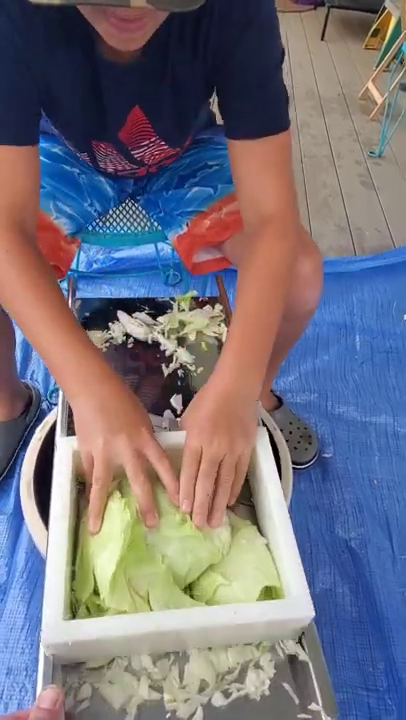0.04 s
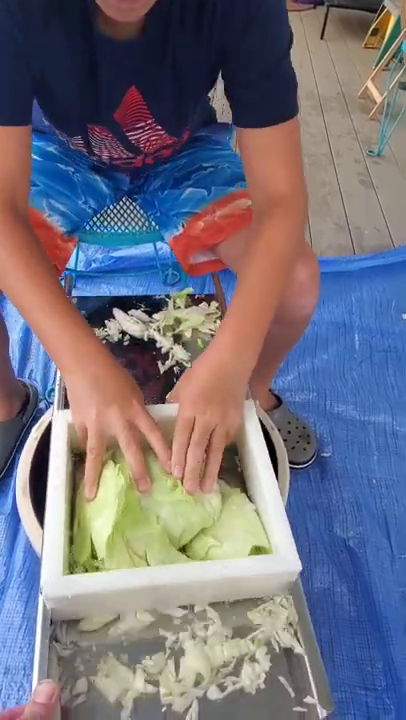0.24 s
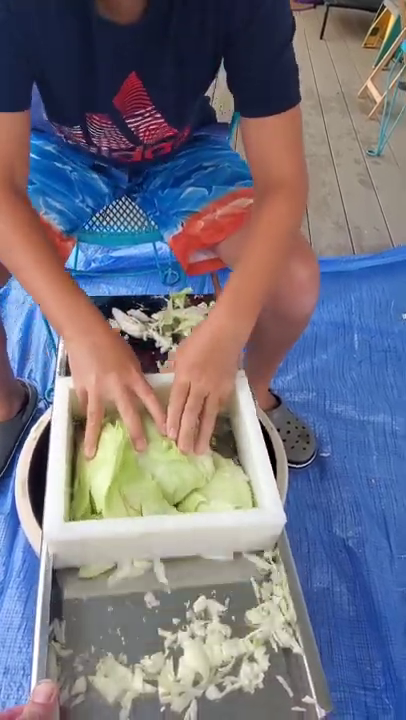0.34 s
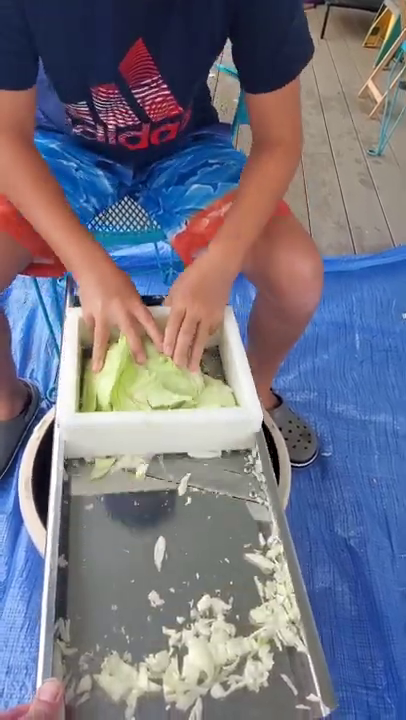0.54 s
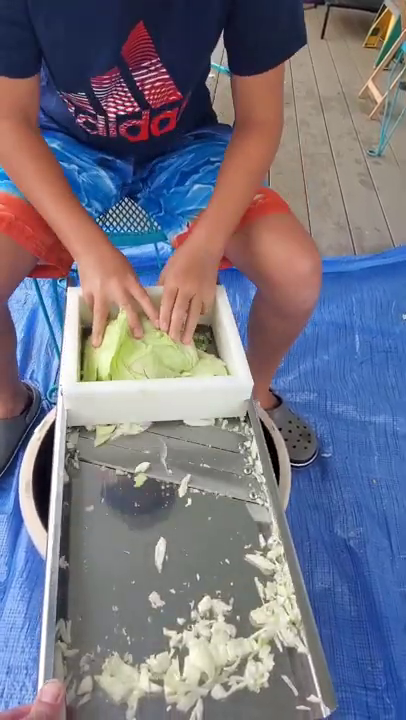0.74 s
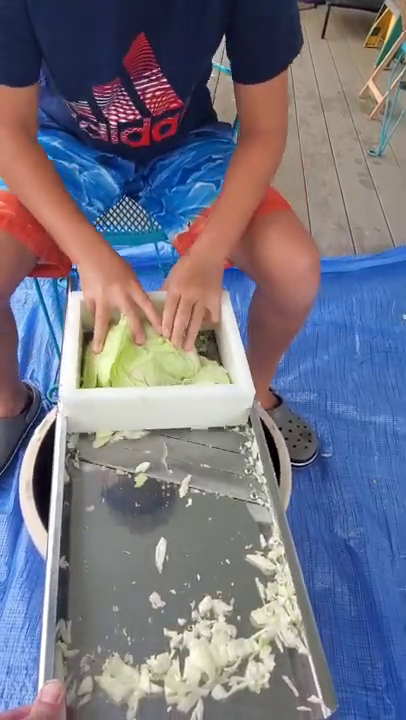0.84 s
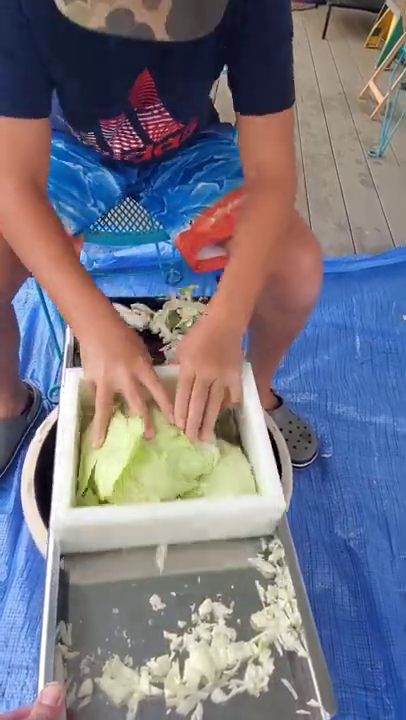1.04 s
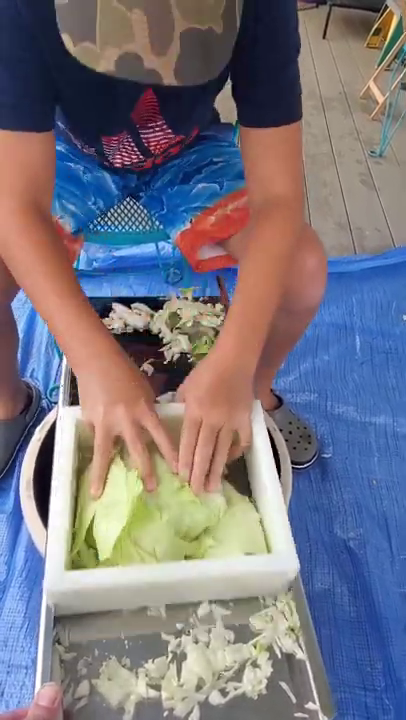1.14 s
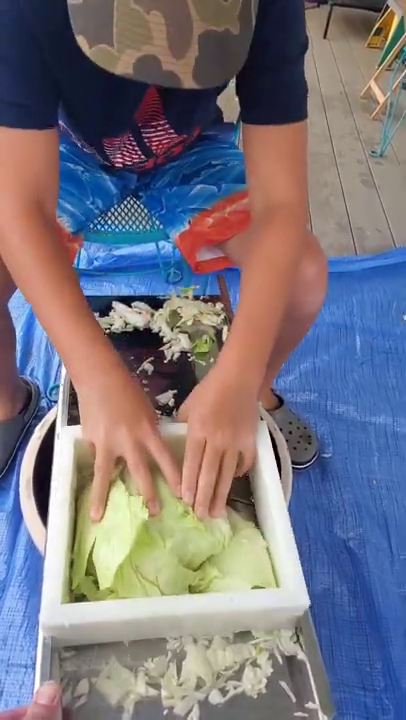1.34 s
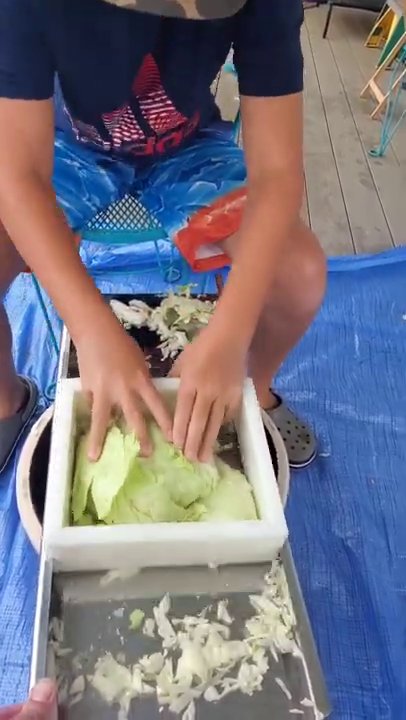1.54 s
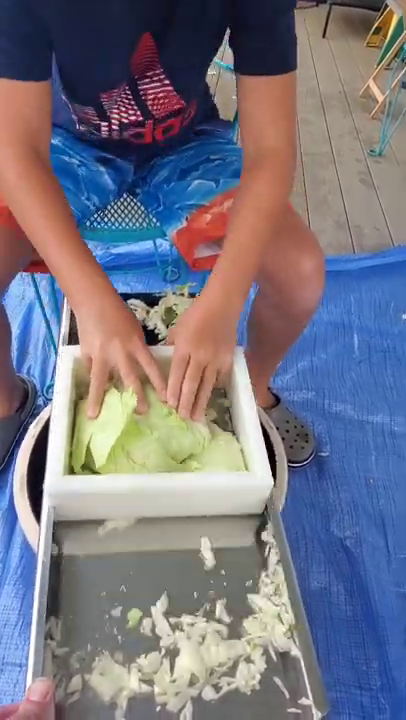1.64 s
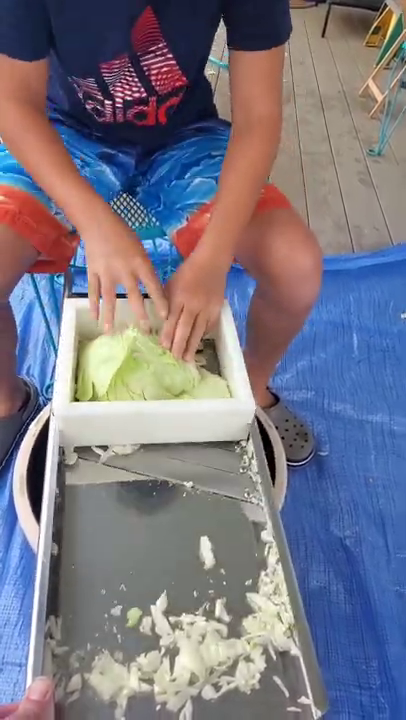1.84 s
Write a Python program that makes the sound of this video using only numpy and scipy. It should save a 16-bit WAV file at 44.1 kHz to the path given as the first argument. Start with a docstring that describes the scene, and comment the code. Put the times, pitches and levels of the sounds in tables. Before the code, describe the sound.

Cabbage being shredded, a plastic box scraping and knocking over steel blades with a crisp crunch.

```python
"""Close, hollow scraping, knocks and a crisp crunch: cabbage being shredded outdoors.
A plastic box slides to and fro on a steel tray. It sticks and slips, knocks on its rails and sets
the tray droning; on the forward stroke the blades burst the leaves' cells in a dense crackle.
Single leaves snap on the way back, and the whole rig bumps dully on its support."""
import sys
import numpy as np
from scipy import signal
from scipy.fft import rfft, irfft
from scipy.io import wavfile
from scipy.ndimage import uniform_filter1d

SR = 44100
rng = np.random.default_rng(int(sys.argv[2]) if len(sys.argv) > 2 else 0)


def master_out(mix):
    """Clip the mix to full scale and print it as 16-bit PCM to the path in sys.argv[1]."""
    frames = np.transpose(np.atleast_2d(mix))
    ceiling = np.clip(frames, -1, 1)
    pcm = np.round(ceiling * 32767).astype(np.int16)
    wavfile.write(sys.argv[1], SR, pcm)


N = 83790

# Tone colours of the noisy layers. Each row: frequency in Hz, relative gain in dB.
AIR_EQ = [(25, 12), (60, 0), (200, -4), (500, -6.5), (800, 3.5), (2000, -52.5), (6000, -24), (16000, -45)]
SWAY_EQ = [(20, -22.5), (45, -7), (70, -1.5), (100, 0.5), (130, -9), (250, -40)]
RUMBLE_EQ = [(25, -40), (55, -15), (110, -12.5), (160, -6), (195, 1), (230, -10.5), (275, -5), (380, -13.5),
             (520, -24), (900, -53.5)]
GROAN_EQ = [(200, -26.5), (310, 11.5), (400, -2), (480, 4.5), (600, -23), (1200, -42)]
SCRAPE_EQ = [(150, -24.5), (330, -3.5), (540, -14.5), (680, 2.5), (790, 2), (950, -2.5), (1150, -8.5),
             (1450, -10.5), (1850, -17.5), (2500, -7.5), (3300, -13), (4800, -20), (9000, -39),
             (16000, -65)]
CLATTER_EQ = [(200, -13), (400, -3.5), (560, 0.5), (750, 6.5), (1100, -3.5), (1500, -5.5), (2000, -7),
              (2900, -13), (4000, -20.5), (16000, -53)]
CRACK_EQ = [(300, -12.5), (1300, 2.5), (2600, -7), (4000, -2), (6000, -7), (10000, -17), (16000, -15)]
SNAP_EQ = [(800, 2), (2500, 3), (5000, 0), (9000, -0.5), (13000, -2.5), (16000, -1)]
RASP_EQ = [(800, -11), (3000, -8.5), (3700, 0.5), (4200, 2), (4900, -3), (6200, -4.5), (8000, -12),
           (16000, -13.5)]
CUT_EQ = [(400, -44), (1500, 14.5), (3500, 1), (5500, 1.5), (8000, 1.5), (10300, -1), (12500, 1),
          (15500, -4.5)]

# Fader rides of the sustained layers. Each row: time in seconds, gain in dB.
SWAY_RIDE = [(0, -51.5), (.2, -50.5), (.3, -42), (.4, -49.5), (.55, -42.5), (.7, -52), (.8, -58),
             (.95, -52.5), (1.15, -41), (1.35, -56), (1.52, -43.5), (1.9, -49.5)]
DRONE_RIDE = [(0, -39), (.07, -37), (.11, -52), (.32, -56), (.39, -36.5), (.43, -41), (.495, -38),
              (.518, -25), (.57, -37.5), (.66, -39.5), (.74, -62), (.85, -86)]
RUMBLE_RIDE = [(0, -38.5), (.06, -37.5), (.11, -48.5), (.165, -41), (.21, -40), (.3, -36), (.42, -43),
               (.62, -40), (.75, -44.5), (.8, -57.5), (.92, -51), (.99, -32.5), (1.06, -34.5),
               (1.15, -28.5), (1.25, -37), (1.35, -52), (1.43, -60), (1.5, -49), (1.65, -40.5),
               (1.78, -48.5), (1.84, -34), (1.9, -51.5)]
FRICTION_RIDE = [(0, -35), (.04, -36.5), (.09, -48), (.16, -42.5), (.21, -48.5), (.26, -30), (.32, -40),
                 (.38, -31), (.41, -42), (.5, -37.5), (.56, -42.5), (.61, -36.5), (.67, -44.5), (.755, -38),
                 (.8, -53), (.895, -46.5), (.93, -38), (1.0, -33), (1.11, -28.5), (1.2, -29),
                 (1.265, -31.5), (1.31, -44.5), (1.39, -57.5), (1.47, -50), (1.53, -43), (1.66, -37.5),
                 (1.73, -39.5), (1.78, -43), (1.83, -43), (1.9, -44.5)]
CUT_RIDE = [(0, -46), (.04, -46), (.09, -56), (.2, -56.5), (.24, -45.5), (.29, -54.5), (.385, -37.5),
            (.41, -49.5), (.48, -48), (.52, -44.5), (.65, -51.5), (.73, -51.5), (.8, -62.5), (.89, -52),
            (.97, -41), (1.12, -35), (1.26, -44), (1.365, -69.5), (1.44, -60.5), (1.52, -52), (1.66, -50),
            (1.8, -51), (1.9, -54.5)]

# Stereo width. Each row: frequency in Hz, side minus mid in dB.
WIDTH = [(30, -2), (80, 1), (170, -14.5), (350, -9.5), (700, -10.5), (1200, -2.5), (2500, -4), (5000, 0),
         (16000, 0)]
# The scrape leans as the box shifts on its rails. Each row: time in seconds, left minus right in dB.
LEAN = [(0, -0.5), (.6, -1), (1.15, -0.5), (1.55, -2.5), (1.9, 0)]
# Resonances of tray and box. Each row: frequency in Hz, relative level in dB, T60 in seconds.
MODES = [(127.4, -1.5, 0.097), (172.5, 2.5, 0.14), (274, -6.5, .11), (335, -8, 0.1), (394, -11.5, 0.056),
         (605, -21, 0.017), (665, -7, 0.026), (759.5, -2.5, 0.036), (886, -7, 0.039), (1018.4, -10, 0.063),
         (1296, -11, 0.035), (1446, -14, 0.075), (1561, -12.5, 0.092), (1880, -11.5, 0.094),
         (2230, -13, 0.067), (2515, -18, 0.12), (3053, -28, 0.15)]
# Stereo spread of the resonances. Each row: frequency in Hz, lead of the left side in radians.
MODE_PHASE = [(130, -0.18), (270, -.3), (600, -1.14), (850, -0.63), (1050, -0.74), (1400, -1.85),
              (2100, -2.7), (3100, -0.5)]
# Dull bumps of the rig. Each row: centre in seconds, pitch in Hz, level in dB.
BUMPS = [(0.249, 63, -22.5), (.31, 98, -32.5), (1.44, 71.5, -36.5), (1.485, 65, -25), (1.603, 78, -31),
         (1.73, 53.4, -30.5)]
# The box hits rails and stops. Each row: start in seconds, gains of box clack, tray boom and crack
# in dB, pitch favoured by the struck spot in Hz.
KNOCKS = [(.2225, -15, -18, -21, 640), (.227, -15.5, -10.5, -30.5, 690), (.258, -20.5, -17.5, -57, 1080),
          (.271, -26, -29, -55, 1500), (.287, -28.5, -31, -61, 810), (.376, -42, -50, -27.5, 970),
          (.603, -27, -45, -42, 836), (.726, -27.5, -36, -58, 2200), (.749, -35, -41, -60, 810),
          (.829, -51, -72, -67, 746), (.9035, -22.5, -59, -35, 2180), (.983, -27.5, -26.5, -27, 855),
          (1.082, -34, -29.5, -26, 1200), (1.128, -9, -17, -21.5, 1390), (1.132, -17, -18, -41, 900),
          (1.159, -20.5, -20, -49, 1030), (1.189, -23.5, -24, -48, 860), (1.252, -21, -41, -28, 803),
          (1.3745, -45, -65, -68, 790), (1.521, -35, -47, -34.5, 1500), (1.573, -36.5, -54, -56, 870),
          (1.647, -34, -30.5, -55, 810), (1.726, -35, -40, -60, 1260), (1.817, -35, -43, -44, 745),
          (1.865, -41.5, -53, -48, 726)]
# Leaves snap and rip. Each row: start in seconds, length in seconds, level in dB.
LEAF_SNAPS = [(.104, .005, -49.5), (.139, 0.0065, -41), (.338, 0.017, -40), (.372, 0.016, -51),
              (.491, 0.013, -30), (.664, 0.0044, -41), (1.755, 0.015, -37)]
# Leaves drag back over the blades. Each row: start in seconds, length in seconds, level in dB.
LEAF_RASPS = [(.688, 0.015, -36), (.707, 0.014, -35), (.719, 0.011, -42)]

TIME = np.arange(N) / SR
PADDED_HZ = np.arange(N + 1) * SR / (2 * N)  # bins of a double-length spectrum
LEFT_RIGHT = np.array([[.5], [-.5]])  # splits a difference between the sides


def undb(db):
    return 10 ** (np.asarray(db) / 20)


def unit(x):
    return x / np.sqrt(np.mean(x ** 2))


def fader(rows):
    """Gain along a table of seconds and dB."""
    return undb(np.interp(TIME, *np.array(rows).T))


def at_hz(points, hz):
    """Read a table on a log frequency axis."""
    freqs, values = np.array(points).T
    return np.interp(np.log(np.maximum(hz, 1)), np.log(freqs), values)


def colour(x, eq):
    """Minimum-phase EQ that keeps the power of white noise."""
    gain = unit(undb(at_hz(eq, PADDED_HZ)))
    cepstrum = irfft(np.log(gain))
    cepstrum[1:N] *= 2
    cepstrum[N + 1:] = 0
    return irfft(rfft(x, 2 * N) * np.exp(rfft(cepstrum)))[..., :N]


def stereo(pair):
    """Two unrelated sounds become mid and side, narrowest in the low mids."""
    mid = pair[0]
    side = irfft(rfft(pair[1], 2 * N) * undb(at_hz(WIDTH, PADDED_HZ)))[:N]
    return np.array([mid + side, mid - side])


def decay(start, t60):
    """A sudden start and an exponential fall."""
    age = TIME - start
    return (age >= 0) * np.exp(-np.log(1000) * np.maximum(age, 0) / t60)


def convolve(x, response):
    return signal.fftconvolve(np.atleast_2d(x), response, axes=-1)[:, :N]


def noise_pair():
    return rng.standard_normal((2, N))


def wander(per_s):
    """Smooth random movement with an RMS of 1."""
    hold = max(int(SR / per_s), 1)
    steps = rng.standard_normal(N)[np.arange(N) // hold]
    return unit(uniform_filter1d(uniform_filter1d(steps, hold), hold))


def grains(per_s, spread_db):
    """Two streams of tiny clicks, each click smeared by reflections inside the box."""
    smear_t60_s, smear_db = 0.011, 0.5
    fires = rng.random(N) < per_s / SR
    size = fires * undb(spread_db * np.minimum(rng.exponential(size=N), 5))
    smear = np.sqrt(np.abs(convolve(size ** 2, decay(0, smear_t60_s / 2)[None])))
    clicks = size * rng.choice([-1, 1], (2, N))
    return unit(unit(clicks) + undb(smear_db) * unit(smear * noise_pair()))


def ring(part, spot_hz=None):
    """Stereo ring of the "tray" (modes under 500 Hz) or the "box"; a struck spot favours some modes."""
    spot_db, spot_octaves, pan_db = 10.5, 0.25, 1
    t, out = TIME[:N // 4], 0
    for k, (hz, db, t60) in enumerate(MODES):
        if part == ("tray" if hz < 500 else "box"):
            lead = at_hz(MODE_PHASE, hz) * LEFT_RIGHT
            if spot_hz:
                nearness = np.exp(-(np.log2(hz / spot_hz) / spot_octaves) ** 2)
                db = db + spot_db * nearness + pan_db * rng.standard_normal((2, 1))
            envelope = undb(db) * np.exp(-np.log(1000) * t / t60)
            out = out + (-1) ** k * envelope * np.sin(2 * np.pi * hz * t + lead)
    return out


def swell(centre_s, half_width_s):
    """A bell-shaped fade in and out."""
    return np.exp(-((TIME - centre_s) / half_width_s) ** 2)


def outdoor_air():
    """A faint, steady bed of still air."""
    return undb(-61) * stereo(colour(noise_pair(), AIR_EQ))


def rig_bumps():
    """The rig rocks on its support: a deep, uneven sway with bumps of a cycle or two."""
    sway = stereo(unit(colour(noise_pair(), SWAY_EQ))) * fader(SWAY_RIDE)
    return sway + sum(undb(db) * swell(centre, half_width_s=0.01) * np.sin(2 * np.pi * hz * (TIME - centre))
                      for centre, hz, db in BUMPS)


def tray_drone():
    """The tray sings as friction locks onto its strongest mode, wavering in pitch."""
    pitch_hz, waver = 166, 0.016
    phase = 2 * np.pi * np.cumsum(pitch_hz * (1 + waver * wander(33.3))) / SR
    return np.sqrt(2) * np.sin(phase) * fader(DRONE_RIDE)


def squeal():
    """A narrow friction resonance chirps upward under the push."""
    centre_s, centre_hz, glide_hz_per_s, width_hz = 1.06, 1110, 4800, 160
    age = TIME - centre_s
    phase = 2 * np.pi * (centre_hz * age + glide_hz_per_s * age ** 2 / 2)
    pair = np.array([wander(2 * width_hz) * np.cos(phase) + wander(2 * width_hz) * np.sin(phase)
                     for _ in range(2)])
    return stereo(pair * undb(-35) * swell(centre_s, half_width_s=0.019))


def shifting_contact(scrape):
    """Half-octave bands swell and fade as the contact spots shift; a light rub is duller."""
    lowest_hz, patch_db, firm_rub_db = 500, 4, -33
    spectrum, out = rfft(scrape), 0
    hz = np.maximum(np.arange(N // 2 + 1) * SR / N, 1)
    band_position = np.clip(2 * np.log2(hz / lowest_hz), 0, 7)
    tilt_db_per_octave = 0.1258 * (20 * np.log10(fader(FRICTION_RIDE)) - firm_rub_db)
    for k in range(8):
        band = irfft(spectrum * np.maximum(1 - np.abs(band_position - k), 0), N)
        out = out + band * undb(patch_db * wander(per_s=22) + tilt_db_per_octave * k / 2)
    return out


def box_slide():
    """Plastic sticks and slips on steel: the box scrapes, rings and groans, the tray rumbles."""
    scrape_db, ring_db, groan_db, flicker_db = -4, -7.5, -38.5, 1.5
    slips = grains(per_s=1500, spread_db=0) * undb(flicker_db * wander(60.8)) * fader(FRICTION_RIDE)
    box = ring("box")
    ringing = convolve(slips[0], box / np.sqrt(np.sum(box ** 2) / 2))
    rumble = unit(colour(grains(per_s=1500, spread_db=1.5), RUMBLE_EQ)) * fader(RUMBLE_RIDE)
    groan = unit(colour(grains(per_s=1500, spread_db=1.5), GROAN_EQ))
    groan *= undb(groan_db) * swell(1.231, half_width_s=0.082)  # the walls take the forward push
    scrape = undb(scrape_db) * shifting_contact(colour(slips, SCRAPE_EQ))
    sound = stereo(scrape + rumble + groan) + undb(ring_db) * ringing
    return sound * fader(LEAN) ** LEFT_RIGHT


def box_knocks():
    """Each blow on the rails rings box and tray, with a short clatter and a bright crack."""
    clatter_db, crack_attack_s = -8, 0.0022
    tray_blows = clacks = clatter = crack = 0
    for start, box_db, tray_db, crack_db, spot_hz in KNOCKS:
        blow = np.zeros(N)
        blow[int(start * SR)] = 1
        tray_blows += undb(tray_db) * blow
        clacks += undb(box_db) * convolve(blow, ring("box", spot_hz))
        clatter += undb(box_db + clatter_db) * decay(start, t60=0.06)
        attack = np.clip((TIME - start) / crack_attack_s, 0, 1)
        crack += undb(crack_db) * attack * decay(start, t60=0.029)
    noise = colour(clatter * noise_pair(), CLATTER_EQ) + colour(crack * noise_pair(), CRACK_EQ)
    return clacks + convolve(tray_blows, ring("tray")) + stereo(noise)


def leaf_crackle(rows, eq, t60_in_lengths):
    """Leaves snap or drag in short spurts of crackle that rise for half their length, then die away."""
    envelope = 0
    for start, length, db in rows:
        peak = start + length / 2
        rise = np.clip((TIME - start) / (length / 2), 0, 1)
        envelope += undb(db) * np.where(TIME < peak, rise, decay(peak, t60_in_lengths * length))
    return stereo(colour(grains(per_s=4000, spread_db=3.1) * envelope, eq))


def blade_crunch():
    """Crisp cells burst on the blades in a dense, flickering crackle."""
    gain_db, flicker_db = 1.5, 1.5
    cells = grains(per_s=5700, spread_db=-1) * undb(flicker_db * wander(110))
    return undb(gain_db) * stereo(colour(cells * fader(CUT_RIDE), CUT_EQ))


def scene():
    """Box, tray and cabbage over the still outdoor air."""
    box_and_tray = box_knocks() + box_slide() + squeal() + tray_drone()
    crunch = blade_crunch()
    snaps = leaf_crackle(LEAF_SNAPS, SNAP_EQ, t60_in_lengths=5.1)
    rasps = leaf_crackle(LEAF_RASPS, RASP_EQ, t60_in_lengths=4.7)
    return outdoor_air() + rig_bumps() + box_and_tray + snaps + rasps + crunch


def record(dry):
    """A steep low-pass takes off the very top."""
    top_hz = 15700
    return signal.sosfilt(signal.ellip(10, .2, 80, top_hz, fs=SR, output="sos"), dry)


dry = scene()
out = record(dry)
master_out(out)
```